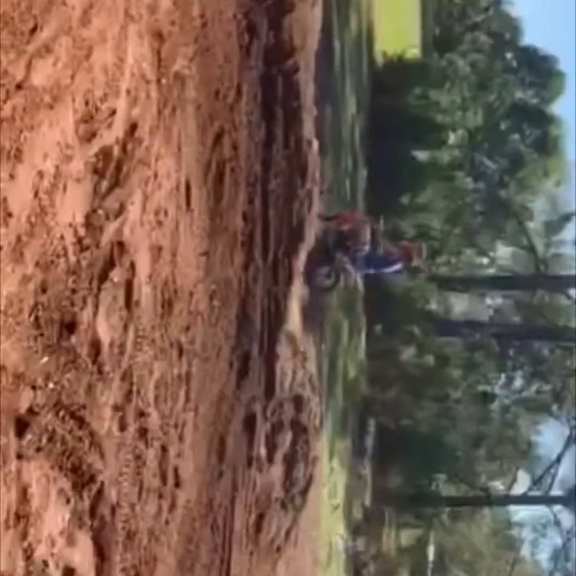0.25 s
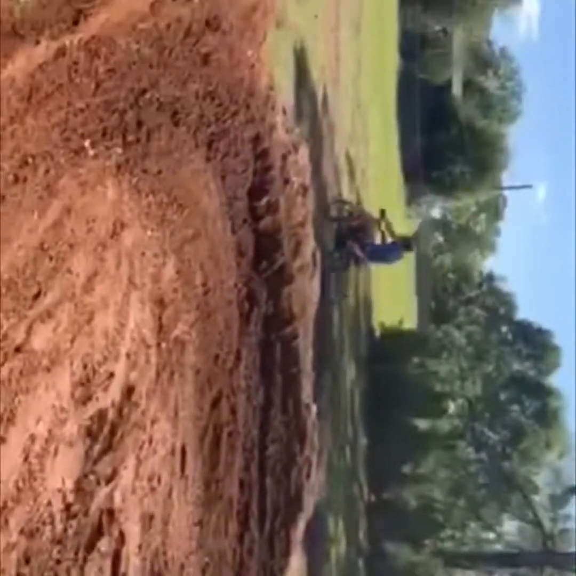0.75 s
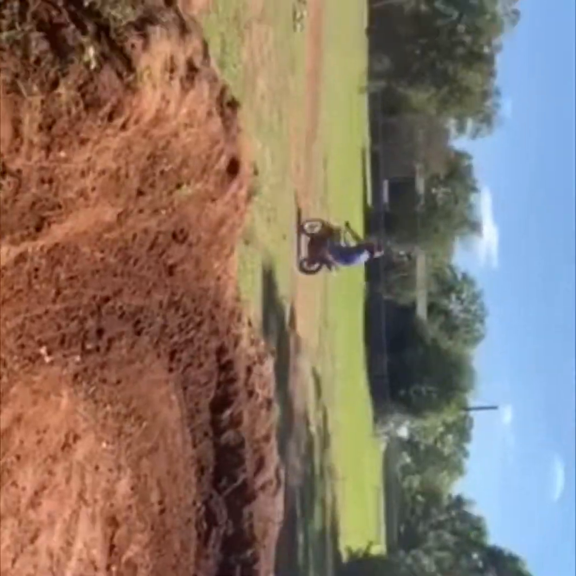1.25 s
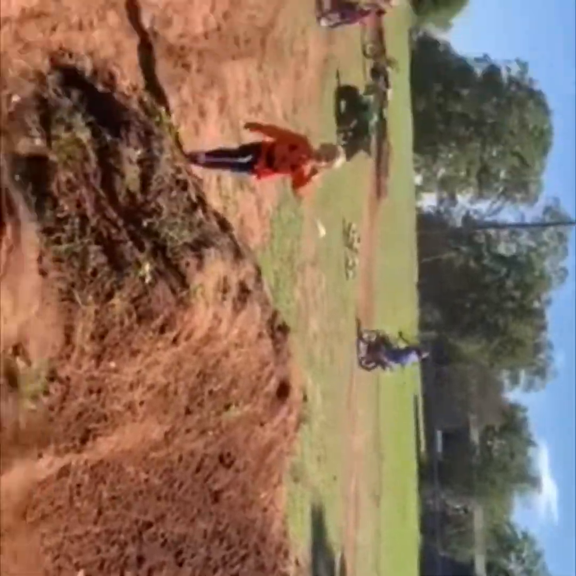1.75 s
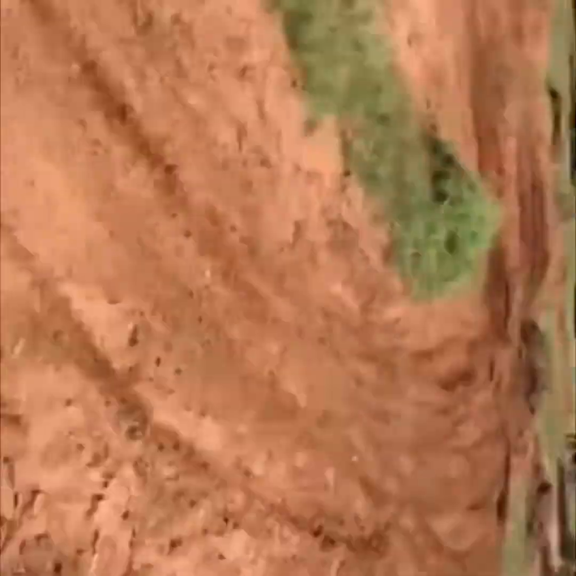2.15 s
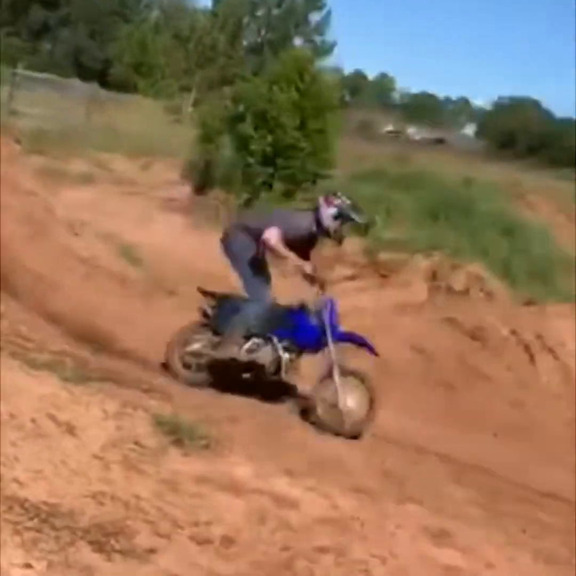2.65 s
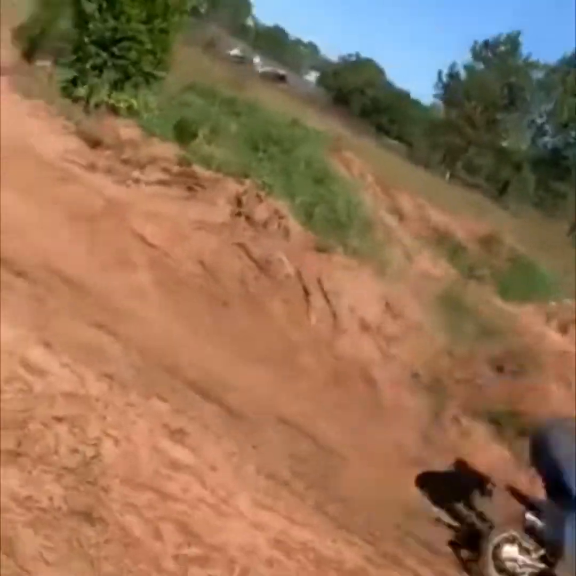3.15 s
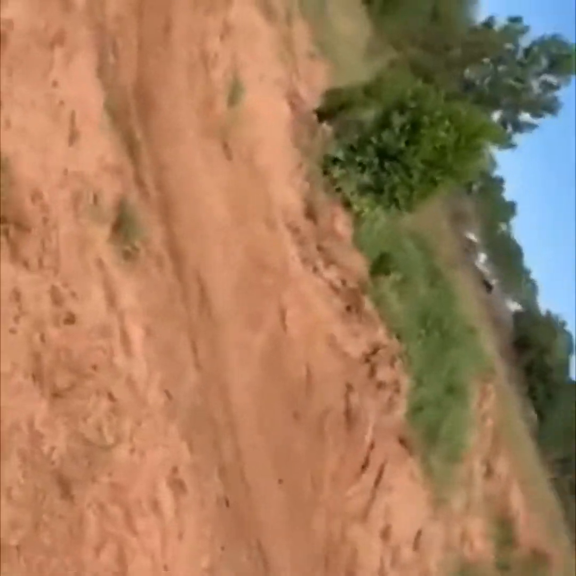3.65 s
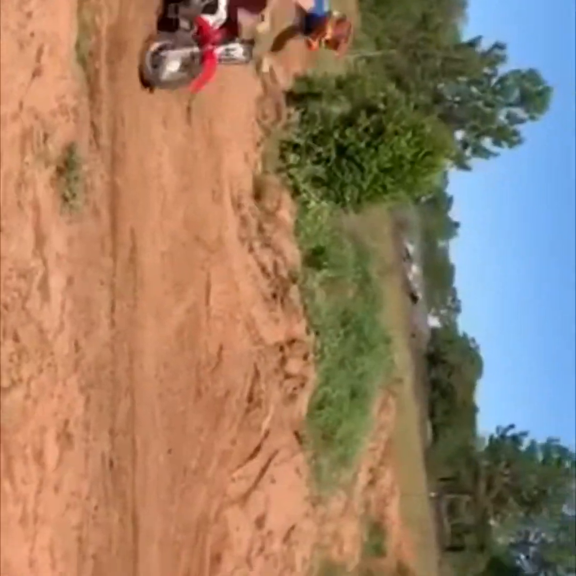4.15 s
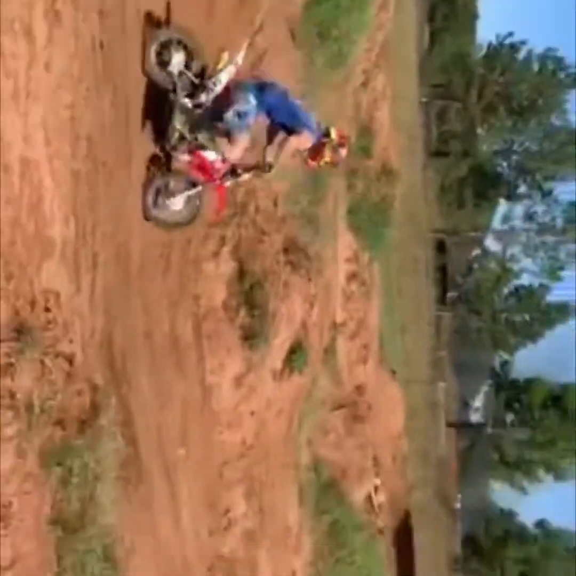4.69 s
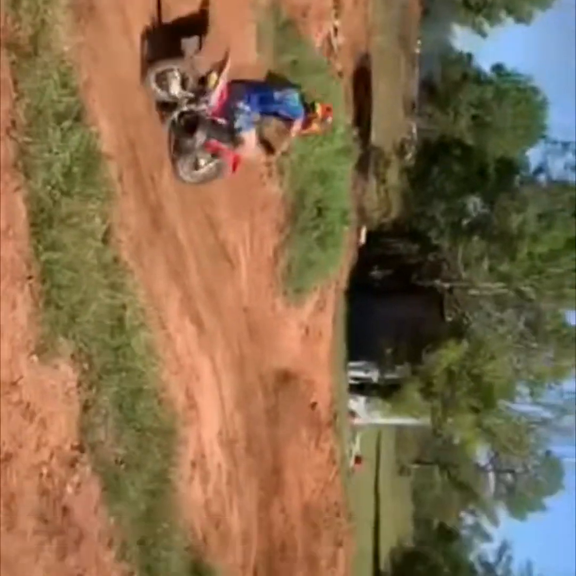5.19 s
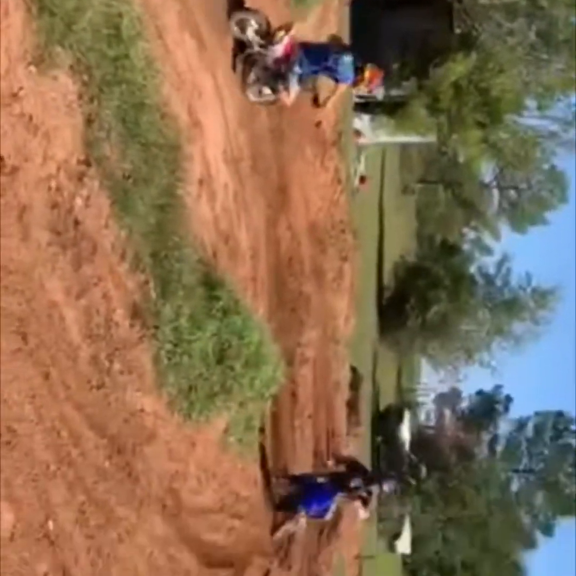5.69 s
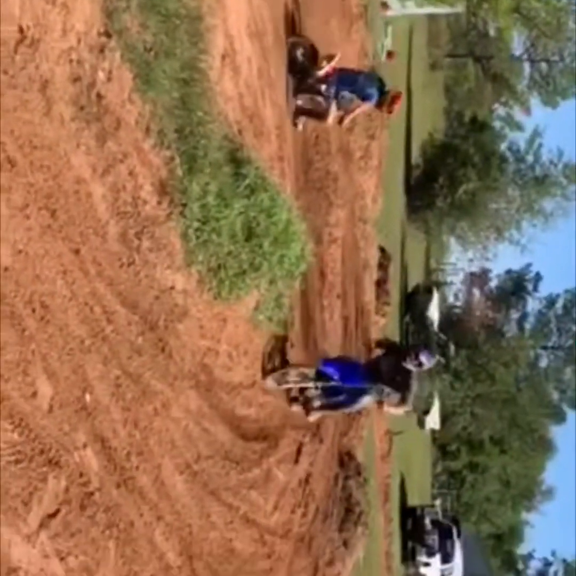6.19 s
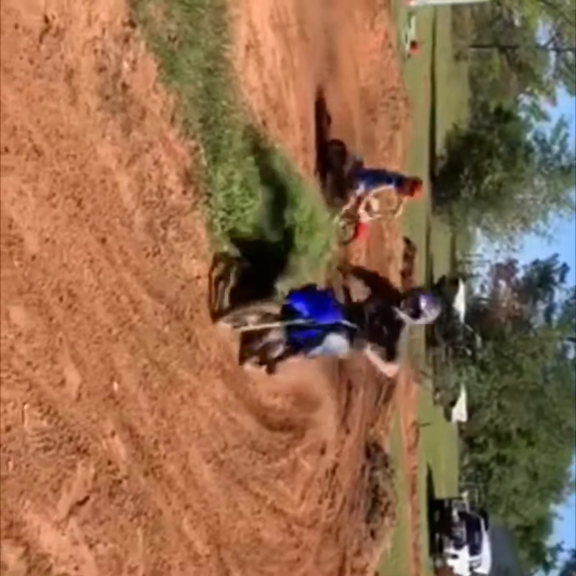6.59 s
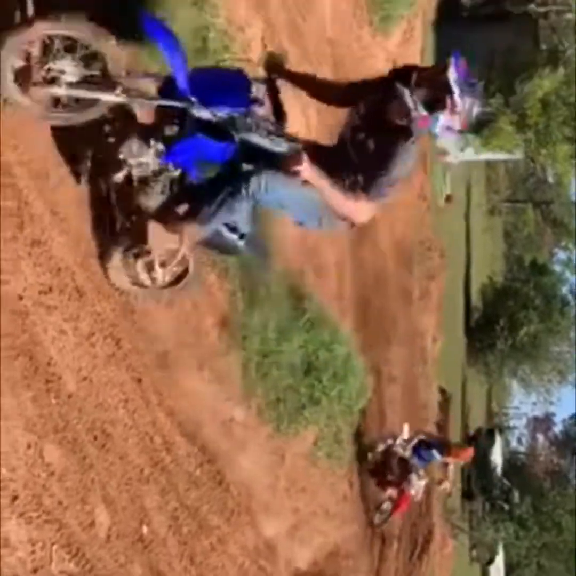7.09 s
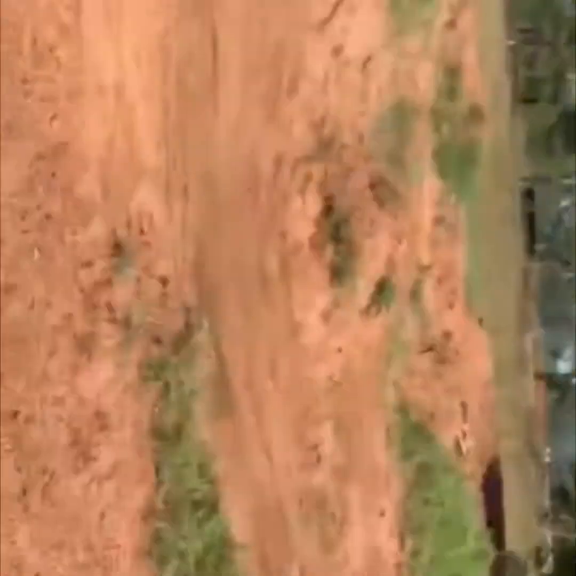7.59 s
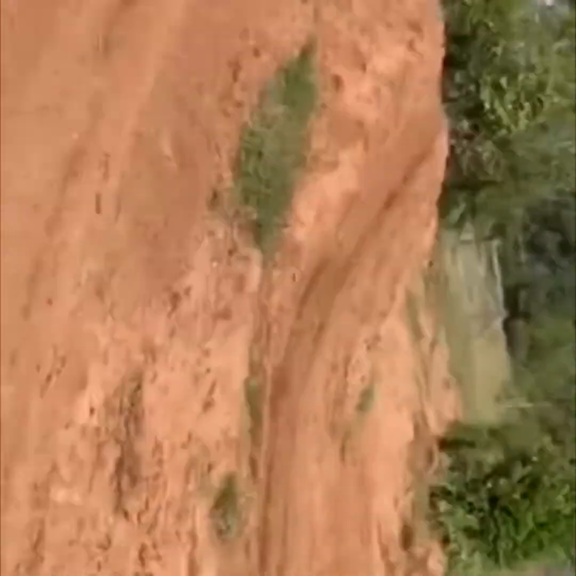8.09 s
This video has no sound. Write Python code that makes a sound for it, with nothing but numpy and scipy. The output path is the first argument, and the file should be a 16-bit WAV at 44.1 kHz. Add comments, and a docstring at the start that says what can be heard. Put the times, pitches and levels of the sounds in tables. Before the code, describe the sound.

Close to the microphone a large engine idles in a deep, uneven throb, with dull bumps on bodywork and a faint far bike crackle. The idle abruptly drops out as a small bike bursts over a hill, shuts throttle and coasts down. A second bike pops uphill in revs, blips, then a rising pull passes very close while the idle swells back. Open dirt track.

```python
"""Two small single-cylinder pit bikes lap a dirt track, opening and closing the throttle as they pass.
Each firing is a pulse: it drives the pipe's thrum, an exhaust bark and a rasping puff of gas.
Close by, an eight-cylinder engine idles with a loping throb, from engine orders and shaped noise.
The idle drops away abruptly as the first bike comes over the hill, then slowly swells back.
A few bumps ring the modes of its bodywork, a stone ticks once, and filtered noise makes open air."""
import sys
import numpy as np
from scipy import signal
from scipy.fft import rfft, irfft, next_fast_len
from scipy.io import wavfile

SR = 44100
rng = np.random.default_rng(int(sys.argv[2]) if len(sys.argv) > 2 else 0)


def to_wav(sig):
    """Store sig (one row per channel, or 1-D mono) as 16-bit WAV at the path in sys.argv[1].

    Samples outside -1..1 are clipped; the rate is SR.
    """
    pcm = np.clip(np.atleast_2d(sig), -1, 1) * 32767
    pcm = np.round(pcm).astype(np.int16)
    wavfile.write(sys.argv[1], SR, pcm.T)  # frames by channels


N = 367794
TIME = np.arange(N) / SR

# Spectra: only the shape counts, colour() normalises the power.
# pipe resonance: (frequency [Hz], relative density [dB])
THRUM = [(45, -30), (70, -10), (95, -2), (125, 2), (165, 1), (215, 0), (255, -5), (340, -8), (420, -8),
         (500, -15), (600, -30), (800, -45)]
# exhaust bark of the leader: (frequency [Hz], relative density [dB])
LEADER_BARK = [(480, -2), (590, -6), (680, 8), (830, 16.5), (1000, 7.5), (1150, 10.5), (1320, 18),
               (1550, 5), (1750, 10), (1970, 11.5), (2200, -11), (2550, 2.5), (2900, -12), (3600, -8),
               (4300, -26), (4800, -27)]
# exhaust gas rasp of the chaser: (frequency [Hz], relative density [dB])
CHASER_RASP = [(3100, -2.5), (3700, -22), (4700, -20), (5200, -9), (5700, -6), (6600, 1), (7200, -5),
               (7650, 0), (9000, -22), (10300, -9), (11700, -9), (13000, -27), (14500, -15), (16000, -25)]
# engine speed on the downhill run: (time [s], speed [firings/s])
DOWNHILL_SPEED = [(2.4318, 83), (2.485, 83), (2.515, 81), (2.55, 81.9), (2.61, 84.6), (2.68, 83.7),
                  (2.74, 84.5), (2.89, 84.2), (2.95, 77.5), (3.05, 73.2), (3.2, 67.5), (3.38, 61.4),
                  (3.6, 55.2), (3.7, 56.4), (3.8, 54.2), (3.98, 48.9), (4.15, 46)]
RAGGED = .4  # turbulent noise against pulses


def from_db(db):
    """Amplitude factor of a level in dB."""
    return 10 ** (np.asarray(db) / 20)


def rms_one(x):
    """Scale to unit rms."""
    return x / np.sqrt(np.mean(x ** 2) + 1e-20)


def in_time(rows):
    """A (time, value) curve at every sample."""
    return np.interp(TIME, *np.transpose(rows))


def white():
    """White noise of unit power."""
    return rng.standard_normal(N)


def drift(rate_hz):
    """Smooth random curve of spread 1, changing about rate_hz times a second."""
    # computed on every 100th sample; the first 1000 values settle the filter
    r = np.exp(-200 * np.pi * rate_hz / SR)
    slow = signal.lfilter([1], [1, -2 * r, r * r], rng.standard_normal(N // 100 + 1002))[1000:]
    return np.interp(np.arange(N) / 100, np.arange(len(slow)), rms_one(slow))


def colour(x, spectrum):
    """Causal (minimum-phase) filter of the given spectrum; keeps the power of white input."""
    size = 2 * next_fast_len(N // 2 + SR // 4)
    hz, db = np.transpose(spectrum)
    octave = np.log2(np.maximum(np.fft.rfftfreq(size, 1 / SR), 1))
    outside = np.abs(octave - np.clip(octave, np.log2(hz[0]), np.log2(hz[-1])))
    # beyond the table: 30 dB/octave, for two octaves
    density_db = np.interp(octave, np.log2(hz), db) - 30 * np.minimum(outside, 2)
    gain = rms_one(from_db(density_db))
    # folding the cepstrum gives the minimum phase
    cepstrum = irfft(np.log(gain))
    cepstrum[1:size // 2] *= 2
    cepstrum[size // 2 + 1:] = 0
    return irfft(rfft(x, size) * np.exp(rfft(cepstrum)))[..., :N]


def fade(clicks, seconds):
    """Each unit click starts an exponential decay of height 1."""
    return signal.lfilter([1], [1, -np.exp(-1 / (seconds * SR))], clicks + 1e-18)


def ring(clicks, hz, t60_s):
    """A unit click sets a decaying sine of height 1 ringing."""
    r, w = from_db(-60 / (t60_s * SR)), 2 * np.pi * hz / SR
    return signal.lfilter([0, np.sin(w)], [1, -2 * r * np.cos(w), r * r], clicks + 1e-18)


def open_air(level_db=-64.0, side_db=-31):
    """Steady coloured noise, mostly alike in both channels."""
    # (frequency [Hz], relative density [dB])
    air_spectrum = [(30, -8), (120, -9), (400, 8), (700, -23), (1400, -22), (2500, -42), (6000, -38),
                    (16000, -35)]
    mid, side = rng.standard_normal((2, N))
    noise = mid + from_db(side_db) * side * [[1], [-1]]
    return from_db(level_db) * colour(noise, air_spectrum)


def every_round(rounds, count):
    """Random shape of spread 1, made of count harmonics, repeating on every engine round."""
    shape = rms_one(irfft(np.r_[0, np.exp(2j * np.pi * rng.random(count))], 2 ** 16))
    return np.interp(rounds % 1, np.linspace(0, 1, len(shape)), shape)


def partly_repeating(rounds, share):
    """Noise of which the given share of power is the same on every round."""
    return np.sqrt(share) * every_round(rounds, count=4000) + np.sqrt(1 - share) * white()


def idle_gain(drop_s=2.385, drop_length_s=0.042, back_s=7.253, swell_db_per_s=7.5):
    """Full level, a sudden drop, then a swell even in dB that is complete at back_s."""
    held = np.clip(1 - (TIME - drop_s) / drop_length_s, 0, 1)
    swell = from_db(swell_db_per_s * np.minimum(TIME - back_s, 0))
    return np.maximum(held, swell)


def engine_orders(turn, waver_db=1.36):
    """Tones at multiples of the firing rate, wavering in level and phase."""
    # (multiple of the firing rate [1], relative rms level [dB])
    orders = [(1, -29), (1.625, -42.5), (2, -30), (2.25, -38.5), (2.5, -44.5), (2.75, -37.5), (3, -35),
              (3.375, -39.5), (3.5, -38), (3.625, -39.5), (3.75, -35), (4, -31.5), (4.5, -38.5), (5, -44),
              (7, -55.5), (8, -54.5), (9, -58), (9.75, -46), (10, -39.5), (10.8, -49.5), (18, -54),
              (22.7, -55), (113.4, -71)]
    tones = 0
    for multiple, db in orders:
        unsteady = min(multiple / 7, 1)  # the lowest orders are the steadiest
        random_start = multiple % 1 > 0 or multiple > 4
        start = rng.uniform(0, 2 * np.pi) * random_start
        phase = multiple * turn + start + .2 * unsteady * drift(3)
        level = from_db(db + waver_db * unsteady * drift(4.4))
        tones = tones + np.sqrt(2) * level * np.cos(phase)
    return tones


def idling_engine(level_db=-0.88, rumble_db=-28.0, clatter_db=-40, throb=0.23, rattle_db=0.76):
    """Engine orders, throbbing exhaust rumble and valve clatter, partly repeating every 8 firings."""
    # (time [s], speed [firings/s]), before a slight drift
    idle_speed = [(0, 42.3), (.3, 42.5), (1.3, 42.5), (1.55, 42.7), (1.8, 42.4), (2.15, 42.8), (3.1, 42.1),
                  (3.5, 42.6), (5.8, 42.65), (6.5, 43.1), (7.2, 43.2), (8.34, 42.55)]
    # exhaust: (frequency [Hz], relative density [dB])
    rumble_spectrum = [(25, -43), (45, -34), (68, -4.5), (100, -4), (160, -2.5), (195, -4.5), (240, -12.5),
                       (300, -16.5), (370, -18.5), (430, -12.5), (520, -22.5), (650, -41)]
    # valves: (frequency [Hz], relative density [dB])
    clatter_spectrum = [(310, -22.5), (520, -0.5), (673, -2), (847, -3), (977, -1.5), (1140, -4),
                        (1550, -3.5), (1810, -11.5), (2450, -9.5), (4000, -20), (4500, -21.5),
                        (4820, -18.5), (5600, -18), (7150, -22.5), (7650, -19.5), (8600, -26.5),
                        (9690, -34), (13300, -36), (16000, -42)]
    fired = np.cumsum(in_time(idle_speed) * (1 + .0015 * drift(4))) / SR
    turn, rounds = 2 * np.pi * fired, fired / 8  # eight cylinders to a round
    gas = partly_repeating(rounds, share=.25)
    valves = partly_repeating(rounds, share=.35)
    rumble = colour(gas * (1 + throb * np.cos(turn)), rumble_spectrum)
    rattle = from_db(rattle_db * every_round(rounds, count=20))
    clatter = colour(valves * rattle, clatter_spectrum)
    engine = engine_orders(turn) + from_db(rumble_db) * rumble + from_db(clatter_db) * clatter
    return from_db(level_db) * idle_gain() * engine


def bumps(crack_s=0.0094, swell_s=0.0017, lowest_hz=55):
    """Soft or sharp pushes ring the panel modes and set off a short dull crunch of noise."""
    # (mid time [s], relative thud level [dB], relative crack level [dB], contact time [s])
    hits = [(0.893, -14.5, -53, 0.0022), (0.949, -9, -60, 0.0064), (.99, -2, -60, 0.012),
            (1.026, -2, -64, 0.014), (1.508, -15, -38, .0012), (1.518, -13.5, -23, 0.0014),
            (1.527, -13, -30, .0012), (1.538, -3.5, -44, 0.0013), (1.555, -6, -47, 0.0019),
            (4.456, -29, -44, .0012), (4.47, -25, -44, 0.0018), (4.486, -26, -51, .004)]
    # (mode frequency [Hz], relative level [dB], t60 [s])
    panel_modes = [(88, -16.5, 0.1), (131.3, -1, 0.11), (202, -15, 0.11), (262, -8.5, 0.04),
                   (312.7, -15, 0.16), (410, -19.5, 0.03), (586, -13.5, 0.072), (770, -15, 0.047)]
    crunch_spectrum = [(150, 7), (700, 5.5), (1100, 1), (1400, 3), (2600, -6.5), (3300, -18),
                       (5200, -18.0), (9000, -47)]  # (Hz, relative dB)
    cracks, pushes = np.zeros(N), np.zeros(N)
    for at_s, thud_db, crack_db, contact_s in hits:
        cracks[int(np.round(at_s * SR))] = from_db(crack_db)
        across = np.clip(2 * (TIME - at_s) / contact_s, -1, 1)
        pushes += from_db(thud_db) * (1 + np.cos(np.pi * across)) / (contact_s * SR)
    highpass = signal.butter(2, lowest_hz, "high", fs=SR, output="sos")
    pushes = signal.sosfilt(highpass, pushes + 1e-18)
    body = sum(from_db(db) * ring(pushes, hz, t60_s) for hz, db, t60_s in panel_modes)
    crunch = fade(fade(cracks, crack_s), swell_s) / (swell_s * SR)
    return body + colour(crunch * white(), crunch_spectrum)


def stone_tick(at_s=4.3, level_db=-57, ring_s=0.0028):
    """A stone flicked up by a tyre ticks once: a decaying burst of bright noise."""
    click = np.zeros(N)
    click[int(at_s * SR)] = from_db(level_db)
    tick_spectrum = [(900, -5), (2300, -13), (3300, 2), (5000, -5), (8000, -8), (14000, -18)]
    return colour(fade(click, ring_s) * white(), tick_spectrum)


def firings(speed_rows, uneven_db):
    """One pulse per firing, strength scattered by uneven_db; about unit power while running."""
    speed = in_time(speed_rows)
    running = (TIME >= speed_rows[0][0]) & (TIME < speed_rows[-1][0])
    count = np.ceil(np.cumsum(speed * running) / SR)
    at = np.flatnonzero(np.diff(count, prepend=0) > 0)
    pulses = np.zeros(N)
    pulses[at] = np.sqrt(SR / speed[at]) * from_db(uneven_db * white()[at])
    return pulses


def throttle(name):
    """Throttle opening on one run: each twist rolls on, holds and rolls off."""
    # (run, starts opening [s], starts shutting [s], opening [0-1], roll time on or off [s])
    twists = [("far", -.05, 0.15, 0.93, 0.048), ("far", 0.386, 1.054, 0.99, 0.053),
              ("downhill", 2.466, 2.89, 0.98, 0.014), ("downhill", 3.6, 3.88, .38, 0.055),
              ("chaser", 3.88, 4.51, 0.93, 0.084), ("chaser", 4.775, 4.855, 0.72, 0.06),
              ("blip", 5.15, 5.41, 0.99, 0.15), ("close", 5.39, 6.52, 0.95, 0.59),
              ("close", 6.3, 7.52, 0.78, 0.37)]
    openings = []
    for who, opens_s, shuts_s, opening, roll_s in twists:
        if who == name:
            ramp = np.minimum(TIME - opens_s, shuts_s + roll_s - TIME) / roll_s
            openings.append(opening * np.clip(ramp, 0, 1))
    return np.max(openings, axis=0)


def below_top(speed_rows):
    """Firings per second by which the engine runs under its top speed."""
    speed = in_time(speed_rows)
    return speed.max() - speed


def loudness_of(name, speed_rows, levels):
    """Thrum, bark and rasp in dB: each grows with the throttle and sinks as the revs fall."""
    load, slower = throttle(name), below_top(speed_rows)
    return np.array([shut_db + (open_db - shut_db) * load - loss_db * slower
                     for shut_db, open_db, loss_db in levels])


def through_silencer(pulses, corner_hz=700, count=5):
    """The chambers delay the lows (all-pass chain), so each pop sweeps quickly downwards."""
    r = np.exp(-2 * np.pi * corner_hz / SR)
    for _ in range(count):
        pulses = signal.lfilter([-r, 1], [1, -r], pulses + 1e-18)
    return pulses


def bike(pulses, loudness, pipe, bark_spectrum, rasp_spectrum, rough, puff_s, spray_db,
         crisp=0.47, side_db=1.5, swell_s=0.0004):
    """Each firing makes a pipe thrum, a bark, and a sharp crack with a rasping puff of gas."""
    # rasp that differs between the ports: (frequency [Hz], relative density [dB])
    side_spectrum = [(1800, -8), (3200, -5.5), (4400, 3), (5800, -4), (7000, -17), (8200, -2), (9800, -5),
                     (11200, -26), (12400, -8), (14000, -12), (15500, -23)]
    thrum_db, bark_db, rasp_db = loudness
    power = pulses ** 2
    puffs = np.sqrt(fade(fade(power, puff_s), swell_s) / (puff_s * SR * swell_s * SR))
    spray = np.sqrt(fade(power, 0.0096) / (0.0021 * SR))  # echoes scattered off the dirt banks
    gas = (puffs + from_db(spray_db) * spray) / (1 + from_db(spray_db))
    pops = through_silencer(pulses)
    thrum = colour((pops + rough / 4 * spray * white()) * from_db(thrum_db), pipe)
    bark = colour((pops + rough * gas * white()) * from_db(bark_db), bark_spectrum)
    rasp = colour((crisp * pulses + gas * white()) * from_db(rasp_db - 1), rasp_spectrum)
    side = colour(gas * white() * from_db(rasp_db + side_db), side_spectrum)
    return thrum + bark + rasp + side * [[1], [-1]]


def intake_honk(pulses, speed_rows, level_db, start_hz, end_hz, ring_s, scatter):
    """Every firing rings a resonance that follows the revs; pitch and strength vary by pop."""
    speed = in_time(speed_rows)
    pop = np.cumsum(pulses > 0)
    detune, strength = rng.standard_normal((pop[-1] + 1, 2))[pop].T
    since_s = TIME - np.maximum.accumulate(TIME * (pulses > 0))
    hz = np.interp(speed, [speed.min(), speed.max()], [start_hz, end_hz]) * np.exp(scatter * detune)
    level = from_db(level_db + 2 * strength) * (pop > 0)
    return level * np.exp(-since_s / ring_s) * np.sin(2 * np.pi * hz * since_s)


def far_bike():
    """A bike on the far side of the track crackles twice under throttle."""
    # (time [s], speed [firings/s])
    far_speed = [(0, 48), (.456, 48.5), (.7, 47.5), (1.08, 48)]
    # thrum, bark, rasp: (shut [dB], open [dB], loss below top speed [dB per firing/s])
    far_levels = [(-78, -75, 6), (-87, -79, 12), (-88, -54.5, 1)]
    loudness = loudness_of("far", far_speed, far_levels)
    return bike(firings(far_speed, uneven_db=-1.0), loudness, THRUM, LEADER_BARK, CHASER_RASP, RAGGED,
                puff_s=0.00051, spray_db=-19, crisp=.2, side_db=-1.5)


def overrun(pulses, presence_db, top_db=-59.5, loss_db=0.5, lift_db=15, puff_s=0.0061):
    """Soft hollow puffs at shut throttle; a little throttle swells them, nearly full kills them."""
    # (frequency [Hz], relative density [dB])
    overrun_spectrum = [(650, -6), (880, 17), (1080, 5), (1330, 20), (1500, 7), (1700, 16), (2000, -4),
                        (2600, -14)]
    load = throttle("downhill")
    light = np.clip(2 * (1 - load), 0, 1)
    level_db = top_db + lift_db * load + presence_db - loss_db * below_top(DOWNHILL_SPEED)
    gas = np.sqrt(fade(pulses ** 2, puff_s) / (puff_s * SR))
    puffs = through_silencer(pulses) + RAGGED * gas * white()
    return colour(puffs * light * from_db(level_db), overrun_spectrum)


def downhill_bike(pan_db=1.0):
    """The leader clears the hill at high revs, shuts off and coasts down, a little to the left."""
    # clears the hilltop, later rides out of earshot: (time [s], relative level [dB])
    presence = [(2.43, -9), (2.495, -0.5), (3.9, -1), (4.15, -19)]
    # thrum, bark, rasp: (shut [dB], open [dB], loss below top speed [dB per firing/s])
    downhill_levels = [(-44, -42.5, 0.13), (-90, -48.5, 0.38), (-63.5, -62.5, 0.57)]
    # pipe, then gas: (frequency [Hz], relative density [dB])
    leader_thrum = [(45, -50), (80, -3.5), (125, 6.5), (170, 5), (215, 3.5), (255, -4.5), (340, -0.5),
                    (420, -6), (500, -11), (600, -29), (800, -32)]
    leader_rasp = [(2500, 5.5), (2950, -8), (3550, 9), (3950, 2.5), (4350, 8.5), (4900, -27), (5700, 7.5),
                   (6800, 6.5), (7900, 0.5), (9000, -29), (10200, 2.5), (11800, -2.5), (13000, -33),
                   (14500, -4), (16000, -36)]
    pulses, presence_db = firings(DOWNHILL_SPEED, uneven_db=0.0), in_time(presence)
    loudness = loudness_of("downhill", DOWNHILL_SPEED, downhill_levels) + presence_db
    engine = bike(pulses, loudness, leader_thrum, LEADER_BARK, leader_rasp, rough=.25,
                  puff_s=0.022, spray_db=2, side_db=1.5)
    return (engine + overrun(pulses, presence_db)) * from_db([[pan_db / 2], [-pan_db / 2]])


def chasing_bike():
    """The second bike pulls away from low revs in separate, uneven pops."""
    # (time [s], speed [firings/s])
    chaser_speed = [(3.9326, 44.1), (3.99, 40), (4.09, 46.1), (4.14, 47.6), (4.26, 55.7), (4.5, 56.4),
                    (4.58, 55.2), (4.7, 48.8), (4.8, 50.5), (4.85, 53), (5.24, 50)]
    # thrum, bark, rasp: (shut [dB], open [dB], loss below top speed [dB per firing/s])
    chaser_levels = [(-50, -48, 0.043), (-70, -53.5, 0.22), (-75.5, -56.5, 0.016)]
    # (frequency [Hz], relative density [dB])
    chaser_bark = [(450, -22), (620, -14), (780, -2), (950, -4), (1180, 0), (1390, 4), (1650, -7),
                   (1900, 1), (2320, -10), (2620, -2), (2870, -10), (3150, -6), (3450, -17), (4200, -16),
                   (4900, -30)]
    pulses = firings(chaser_speed, uneven_db=1.95)
    loudness = loudness_of("chaser", chaser_speed, chaser_levels)
    engine = bike(pulses, loudness, THRUM, chaser_bark, CHASER_RASP, RAGGED,
                  puff_s=0.0012, spray_db=-14, crisp=0.11, side_db=0.5)
    return engine + intake_honk(pulses, chaser_speed, loudness[1] + 14,
                                start_hz=1430, end_hz=1320, ring_s=.0009, scatter=.1)


def throttle_blip():
    """The second bike gets a short burst of throttle, and its intake honks."""
    # (time [s], speed [firings/s])
    blip_speed = [(5.2635, 49.2), (5.31, 50.9), (5.37, 54.9), (5.43, 57.9), (5.49, 61), (5.7, 56)]
    # thrum, bark, rasp: (shut [dB], open [dB], loss below top speed [dB per firing/s])
    blip_levels = [(-52, -41.5, .05), (-69, -50.5, 0.097), (-67, -55, 0.14)]
    # (frequency [Hz], relative density [dB])
    blip_bark = [(450, -28), (750, 4), (1020, 10), (1350, -1), (1800, -16), (2300, -5), (2800, -12),
                 (3400, -23), (4100, -5), (4800, -28)]
    pulses = firings(blip_speed, uneven_db=0.2)
    loudness = loudness_of("blip", blip_speed, blip_levels)
    engine = bike(pulses, loudness, THRUM, blip_bark, CHASER_RASP, RAGGED,
                  puff_s=0.00065, spray_db=-12, crisp=0.33, side_db=1.0)
    return engine + intake_honk(pulses, blip_speed, loudness[1] + 16,
                                start_hz=2150, end_hz=2760, ring_s=0.0015, scatter=.015)


def close_pass(closest_s=7.044, closest_m=1.76, pass_m_per_s=6.2, thrum_dip_db=10,
               tailpipe_db=1.5, bark_shadow_db=11):
    """Two pulls of revs, run together: one further off, then one passing close, tailpipe last."""
    # (time [s], speed [firings/s])
    pass_speed = [(5.6, 50), (5.78, 56), (5.95, 60), (6.08, 64.9), (6.18, 67.2), (6.26, 67.7), (6.4, 71.2),
                  (6.47, 74.5), (6.56, 71.8), (6.68, 70), (6.8, 69.3), (6.9, 72.2), (7.03, 73.4),
                  (7.15, 76.7), (7.3, 77.3), (7.45, 79.1), (7.6, 78.8), (7.9, 74.1), (8.34, 69)]
    # thrum, bark, rasp: (shut [dB], open [dB], loss below top speed [dB per firing/s])
    close_levels = [(-61, -39, 0.057), (-59, -38, 0.34), (-68.5, -50.5, 0.041)]
    # pipe, bark, gas, tailpipe: (frequency [Hz], relative density [dB])
    pass_thrum = [(60, -22), (140, -12), (230, -7), (285, 0), (330, 3), (365, 2), (410, -10), (550, -17),
                  (700, -26)]
    pass_bark = [(450, -24), (780, -16), (830, -8), (880, 4), (940, 4), (985, 1), (1040, 4), (1110, 1),
                 (1180, 2), (1300, -3), (1450, -13), (1650, -10), (1900, -18), (2500, -18), (3200, -22),
                 (4800, -31)]
    pass_rasp = [(2000, 6.5), (3500, -1), (4400, -17), (5700, -2), (6900, 4.5), (8000, -2.5), (9100, -35),
                 (10200, 1), (11800, -2.5), (13000, -23), (14500, -8), (16000, -8)]
    tailpipe_spectrum = [(420, -8), (540, 4), (640, 2), (800, -8), (1100, -10), (1350, 4), (1600, -1),
                         (1820, -11), (2100, -24), (3000, -22)]
    along_m = pass_m_per_s * (TIME - closest_s)
    distance_m = np.hypot(closest_m, along_m)
    spread_db = 20 * np.log10(distance_m / closest_m)
    # thrum is strong in the first pull, weak around the closest moment
    dip_db = thrum_dip_db * closest_m / distance_m
    loudness = loudness_of("close", pass_speed, close_levels) - np.array([dip_db, spread_db, spread_db])
    pulses = firings(pass_speed, uneven_db=.5)
    # once by, the tailpipe points back at the microphone and the body shades the bark
    behind = np.clip(along_m / distance_m, 0, 1)
    tailpipe = colour(pulses * behind * from_db(loudness[1] + tailpipe_db), tailpipe_spectrum)
    loudness[1] -= bark_shadow_db * behind
    return tailpipe + bike(pulses, loudness, pass_thrum, pass_bark, pass_rasp, rough=.15,
                           puff_s=0.0036, spray_db=-22, side_db=1.0)


def at_the_ports(x):
    """The two microphone ports hear the bikes slightly out of phase."""
    # (frequency [Hz], lead of the right port [rad])
    port_lead = [(100, -0.072), (300, 0.44), (600, 0.72), (1200, -0.089), (2200, -0.69), (3500, -0.074)]
    size = 2 * next_fast_len(N // 2 + SR // 4)
    lead = np.interp(np.fft.rfftfreq(size, 1 / SR), *np.transpose(port_lead))
    return irfft(rfft(x, size) * np.exp(.5j * lead * [[-1], [1]]))[:, :N]


def scene():
    """Open air, the idling engine with its bumps, and the bikes on the track."""
    bikes = far_bike() + downhill_bike() + chasing_bike() + throttle_blip() + close_pass()
    return open_air() + idling_engine() + bumps() + at_the_ports(bikes + stone_tick())


def record(dry):
    """The microphone loses the deepest bass; the top is cut steeply."""
    bass_cut = signal.butter(2, 18, "high", fs=SR, output="sos")
    top_cut = signal.ellip(12, .1, 90, 15900, fs=SR, output="sos")
    return signal.sosfilt(top_cut, signal.sosfilt(bass_cut, dry))


dry = scene()
out = record(dry)
to_wav(out)
```